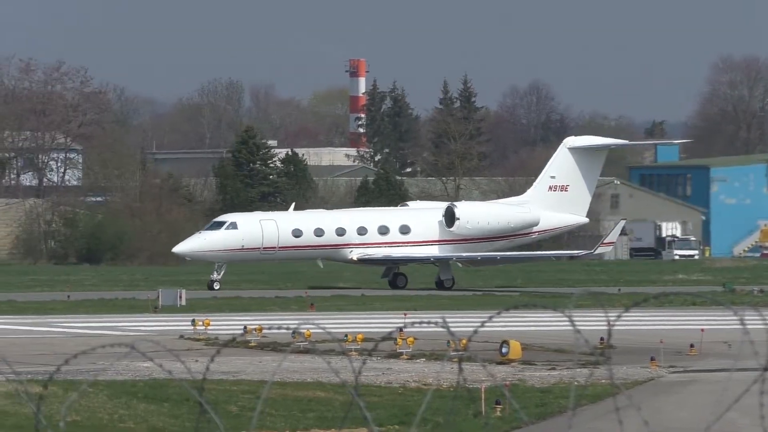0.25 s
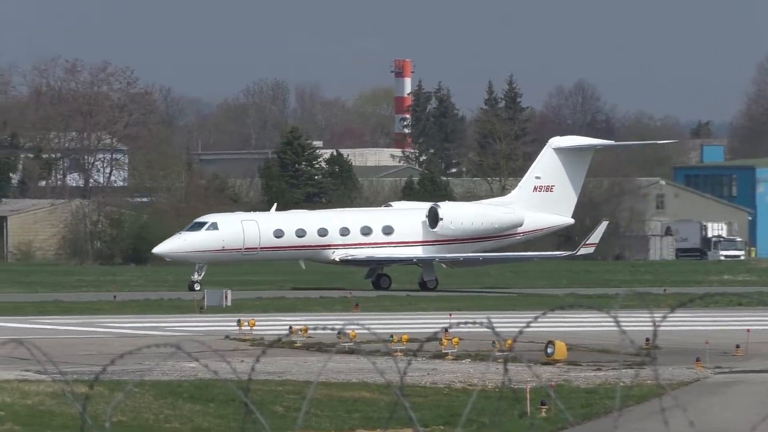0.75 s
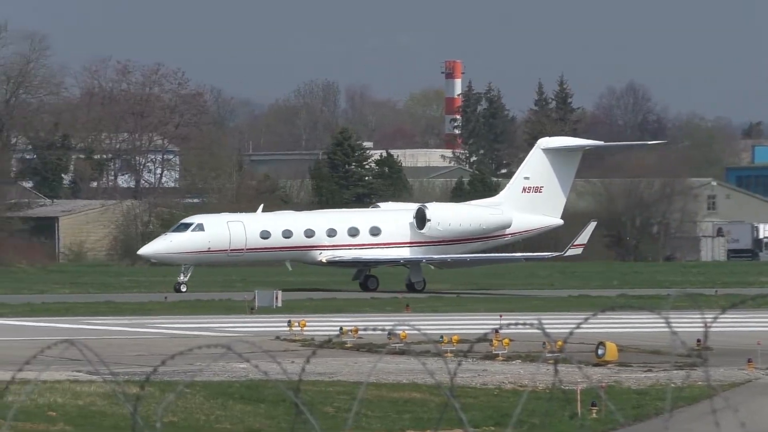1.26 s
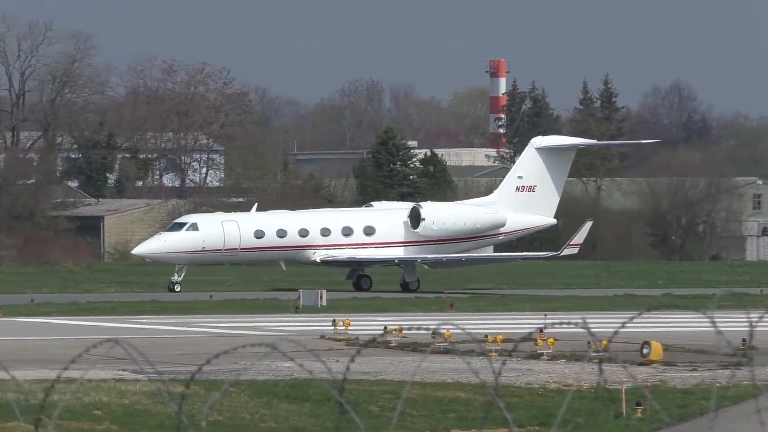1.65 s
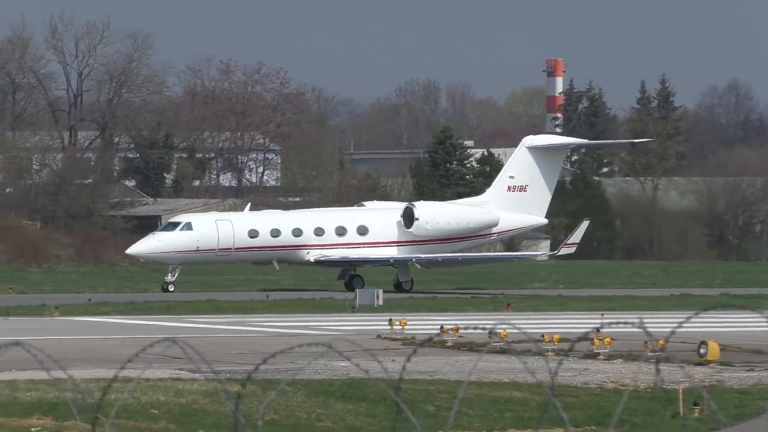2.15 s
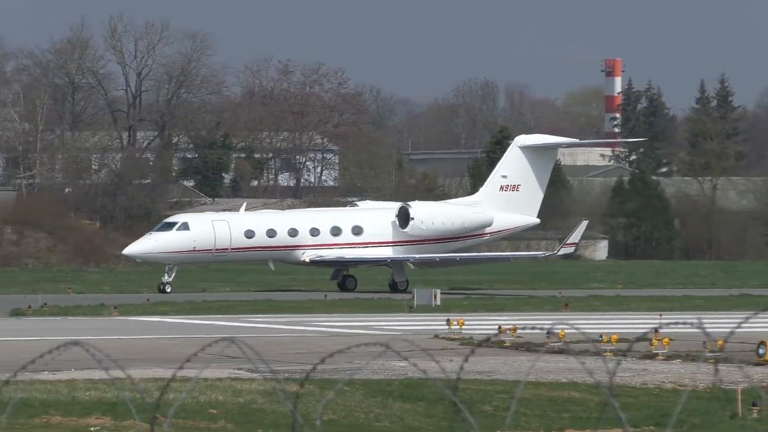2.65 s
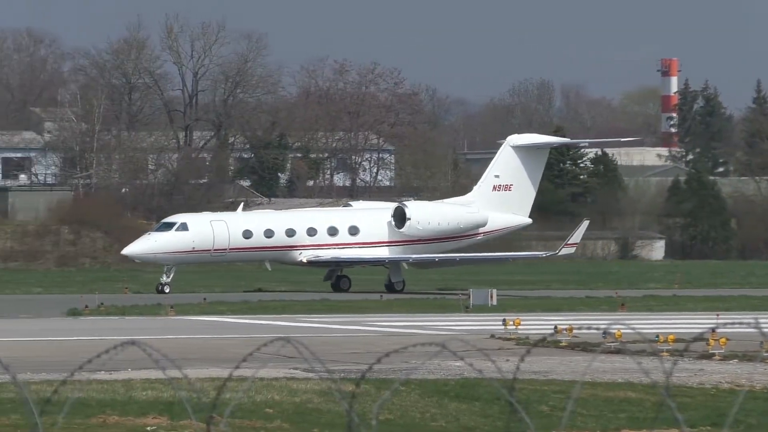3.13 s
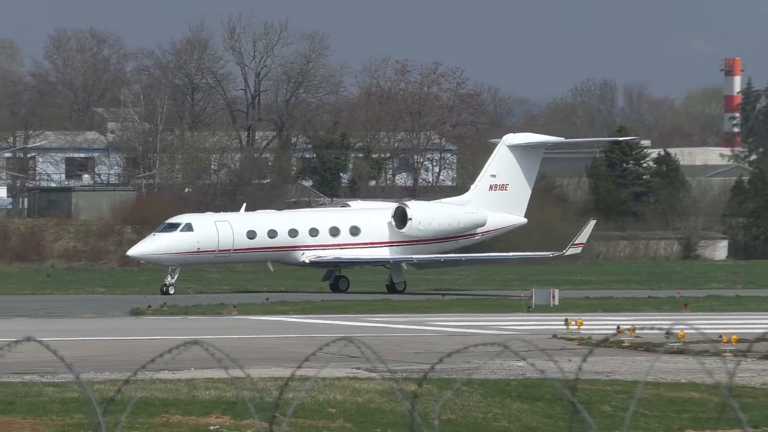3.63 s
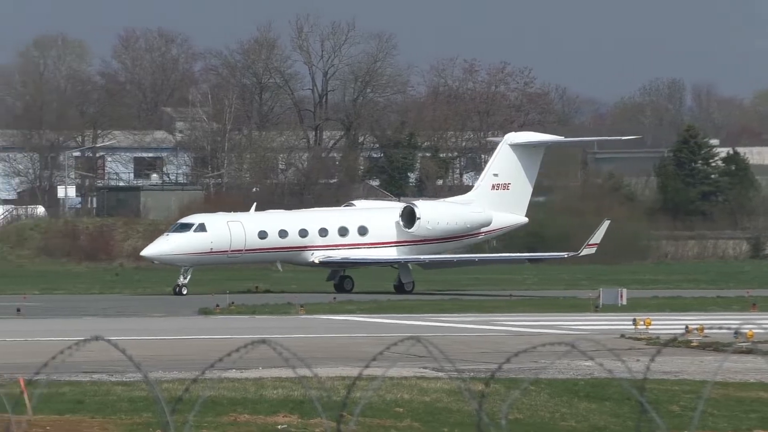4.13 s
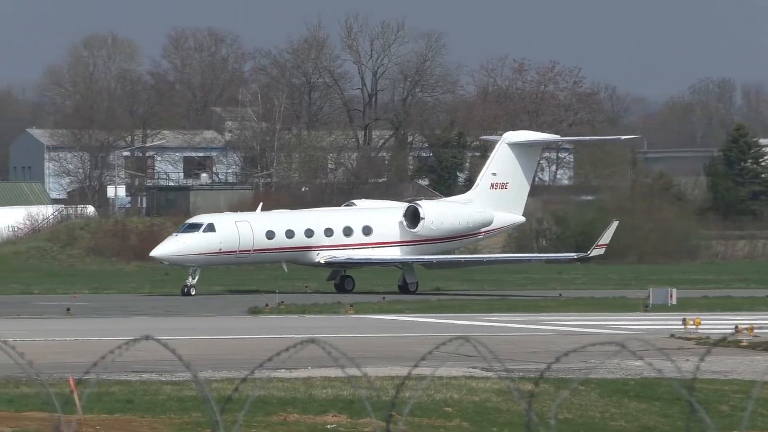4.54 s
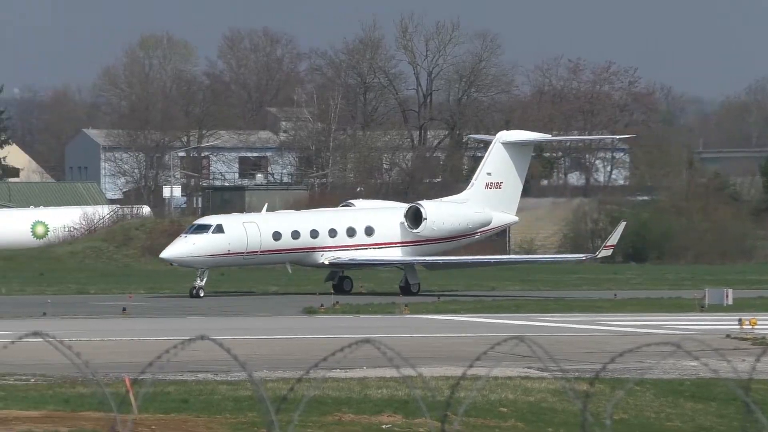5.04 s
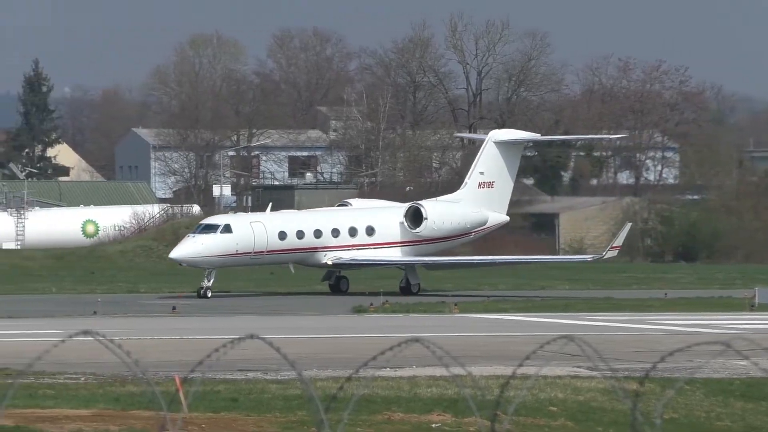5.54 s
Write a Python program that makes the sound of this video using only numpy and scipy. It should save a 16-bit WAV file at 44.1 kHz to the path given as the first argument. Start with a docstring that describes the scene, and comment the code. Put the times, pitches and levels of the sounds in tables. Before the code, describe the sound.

Across an open airfield, jet engines whine and rush unsteadily, growing stronger, while low wind thumps and small bright ticks rattle nearby.

```python
"""A twin-engined business jet taxis past at idle, heard across an airfield from behind the fence.
Compressor and turbine tones follow the engine speed and fade in and out in the moving air.
Shaped noise makes the engines' roar, rush and hiss; a smeared fan tone and a drone sound within it.
Wind buffets the microphone as low noise. Close by, runs of ticks on ringing modes rattle three times,
a few lone ticks fall, and a soft band of high hiss swells once."""
import sys
import numpy as np
from scipy import signal
from scipy.fft import rfft, irfft, next_fast_len
from scipy.io import wavfile
from scipy.ndimage import uniform_filter1d

SR = 44100
rng = np.random.default_rng(int(sys.argv[2]) if len(sys.argv) > 2 else 0)


def file_out(sig):
    """Save sig as 16-bit WAV at sys.argv[1]."""
    # one column per channel
    cols = np.atleast_2d(sig).T
    # limit, then scale
    lim = np.clip(cols, -1, 1)
    pcm = np.round(lim * 32767).astype(np.int16)
    wavfile.write(sys.argv[1], SR, pcm)


N = 255339
T = np.arange(N) / SR  # s
FROM_MIDDLE_S = T - T.mean()
IDLE_HZ = 2051  # strongest compressor tone at idle

# engine noise, relative levels: t/s, roar/dB, rush/dB, intake hiss/dB, fine hiss/dB
FLOW_LEVELS = [(0.0, -43, -45.5, -56, -56), (0.18, -48.5, -43.5, -53, -56.5), (0.73, -41, -37, -38, -44.5),
               (1.33, -39.5, -40.5, -44.5, -54.5), (1.54, -40.5, -36.5, -39, -44.5),
               (1.66, -39, -38.5, -49, -51), (1.86, -39.5, -35, -46.5, -47), (2.27, -39, -40.5, -50.5, -53),
               (2.45, -39, -44, -48.5, -51.5), (2.8, -40.5, -39, -60.5, -54), (3.02, -37, -30.5, -43, -45),
               (3.18, -37.0, -33.0, -53, -50.5), (3.4, -34.5, -36, -47.5, -45.5),
               (3.68, -35, -37, -53.5, -51), (4.06, -32, -31.5, -49, -48.0), (4.6, -34, -33.5, -49.5, -50),
               (5.05, -31, -33, -40, -44), (5.33, -24.5, -29.5, -37.5, -41), (5.63, -38, -32.5, -46, -49.5),
               (5.79, -38, -32, -40.5, -38.5)]
# low end of the engines, relative levels: t/s, deep rumble/dB, upper rumble/dB, drone/dB
EXHAUST_LEVELS = [(0.0, -42, -49.0, -29.5), (0.55, -39, -45, -32.0), (1.1, -41, -43.5, -34.5),
                  (1.55, -37.5, -44.5, -29.5), (2.1, -40, -44.5, -32.5), (2.7, -39.5, -45, -35),
                  (3.15, -36.5, -42.5, -26), (3.7, -43.5, -47.5, -34.5), (4.5, -46.0, -46.5, -35),
                  (5.2, -41.0, -41.0, -34.0), (5.79, -44.5, -46, -38.5)]
# engine noise spectrum: f/Hz, relative density/dB per Hz
ENGINE_SPECTRUM = [(150, -8), (320, -6.5), (430, -10.5), (600, -6), (850, -3), (1080, 1.5), (1450, -5.5),
                   (1850, -11), (2550, -9), (3100, -6), (3800, -15.5), (4700, -23), (6000, -35.5),
                   (10000, -55.5), (15000, -54.5)]


def from_db(db):
    """Decibels to amplitude gain."""
    return 10 ** (np.asarray(db) / 20)


def rms_one(x):
    """Scale to unit rms."""
    return x / np.sqrt(np.mean(x ** 2) + 1e-20)


def in_time(rows):
    """Columns of a time table, interpolated at every sample."""
    s, *columns = np.transpose(rows)
    return [np.interp(T, s, c) for c in columns]


def hump(s, rise_s, fall_s):
    """Gaussian bump of height 1 at time s; 1/e half widths before and after it."""
    return np.exp(-((T - s) / np.where(T < s, rise_s, fall_s)) ** 2)


def drift(rate_hz):
    """Slow random signal of about unit rms: white noise through a two-pole low-pass at rate_hz."""
    step = 40  # samples between drawn values
    r = np.exp(-2 * np.pi * step * rate_hz / SR)
    white = rng.standard_normal(N // step + 2002)
    slow = signal.lfilter([1], [1, -2 * r, r * r], white)[2000:]  # filter settled
    return np.interp(np.arange(N) / step, np.arange(len(slow)), rms_one(slow))


def noise(spectrum, low_hz, high_hz):
    """Gaussian noise of the given spectrum between two soft edges; rms 1."""
    size = next_fast_len(N, real=True)
    hz = np.maximum(np.fft.rfftfreq(size, 1 / SR), .5)
    point_hz, point_db = np.transpose(spectrum)
    gain = from_db(np.interp(np.log(hz), np.log(point_hz), point_db))
    edges = (1 + (low_hz / hz) ** 20) * (1 + (hz / high_hz) ** 20)
    shaped = rfft(rng.standard_normal(size)) * gain / np.sqrt(edges)
    return rms_one(irfft(shaped)[:N])


def tone(hz, flutter, flutter_hz):
    """Sine on a pitch track plus the part that turbulence scatters in both quadratures; rms 1."""
    phase = 2 * np.pi * (np.cumsum(hz * np.ones(N)) / SR + rng.random())
    in_phase = (1 + flutter * drift(flutter_hz)) * np.cos(phase)
    quadrature = flutter * drift(flutter_hz) * np.sin(phase)
    return rms_one(in_phase + quadrature)


def blade_tones(tones, speed, partner_db, flutter, fade_db, twinkle_db):
    """Each tone has a faint partner 0.4% higher; the tones beam and fade separately."""
    out = np.zeros(N)
    for hz, db, turn_db_per_s in tones:
        strong = tone(hz * speed, flutter, flutter_hz=6.7)
        partner = tone(hz * speed * 1.004, flutter, flutter_hz=14)
        # eddies make the tone come and go, slowly and quickly
        air_db = fade_db * drift(1.0) + twinkle_db * np.tanh(drift(8.9))
        level_db = db + turn_db_per_s * FROM_MIDDLE_S + air_db
        out += from_db(level_db) * rms_one(strong + from_db(partner_db) * partner)
    return out


def whine(speed):
    """Compressor and turbine stages follow engine speed; the upper tones surge with the fine hiss."""
    # strength of the main tones as the air carries them: t/s, level/dB
    main_curve = [(0.0, -52), (0.27, -48.0), (0.41, -39.5), (0.58, -44), (0.88, -38), (1.04, -45),
                  (1.58, -33), (1.85, -42), (2.1, -41), (2.4, -59.5), (2.58, -43), (2.92, -49.5),
                  (3.02, -34), (3.26, -36.5), (3.48, -44.5), (4.02, -30), (4.55, -38.5), (4.84, -31.5),
                  (5.05, -43.5), (5.42, -44), (5.6, -35.5), (5.79, -31)]
    # strength of the highest tones: t/s, turbine level/dB, top level/dB (relative)
    whistle_curve = [(0.0, -66.5, -81), (0.7, -64, -69.5), (1.38, -69.5, -74.5), (1.55, -60.5, -64),
                     (1.9, -59, -69.5), (2.35, -63, -69), (2.8, -63, -70), (3.0, -68, -65),
                     (3.45, -55, -63.5), (3.7, -67, -72), (4.35, -57, -62), (4.7, -55, -57.5),
                     (5.1, -56, -57), (5.5, -54.5, -63), (5.79, -60, -72)]
    # tones at idle speed: f/Hz, relative level/dB, change as the jet turns/dB per s
    main_tones = [(2051, 2.5, 0), (2021, -15.5, -1), (2149, -7, -1.5), (2345, -12, 0.5), (2508, -26, -5.5),
                  (2120, -16, -1.5)]
    upper_tones = [(3226, -4, 0), (3062, -7.5, -.3), (3158, -13, -2), (2794, -14, .5), (3512, -20, 0),
                   (3935, -16, 0), (4102, -18, 0)]
    turbine_tones = [(5052, -2, 0), (4338, -5, .2)]
    top_tones = [(5768, -1.5, 0), (6487, -13, 0), (7171, -30, 0), (7849, -30, 0)]

    main_db, = in_time(main_curve)
    turbine_db, top_db = in_time(whistle_curve)
    fine_db = in_time(FLOW_LEVELS)[-1]
    # level at mid-pass, trend as the jet turns, surges of the fine hiss
    upper_db = -45 - 0.43 * FROM_MIDDLE_S + (fine_db - fine_db.mean())

    main = from_db(main_db) * blade_tones(
        main_tones, speed, partner_db=-19.5, flutter=0.17, fade_db=1.06, twinkle_db=2.0)
    # unsteady flow over the blades spreads a hoarse skirt around the strongest tone
    skirt = from_db(main_db - 17) * tone(IDLE_HZ * speed, flutter=4, flutter_hz=70)
    upper = from_db(upper_db) * blade_tones(
        upper_tones, speed, partner_db=-22.5, flutter=0.26, fade_db=3.5, twinkle_db=3.5)
    turbine = from_db(turbine_db + 4.5) * blade_tones(
        turbine_tones, speed, partner_db=-24.5, flutter=0.41, fade_db=2.5, twinkle_db=4.0)
    top = from_db(top_db + 5.5) * blade_tones(
        top_tones, speed, partner_db=-22.5, flutter=0.34, fade_db=-2.0, twinkle_db=6.0)
    return main + skirt + upper + turbine + top


def engine_noise(speed):
    """Turbulent flow in noise bands that the air carries unequally, plus the smeared fan tones."""
    roar_db, rush_db, intake_db, fine_db = in_time(FLOW_LEVELS)
    rumble_db = in_time(EXHAUST_LEVELS)[1]

    low_roar_db = (roar_db + rumble_db) / 2 - 5  # between the rumble and the roar
    low_roar = from_db(low_roar_db) * noise(ENGINE_SPECTRUM, 447, 616)
    roar = from_db(roar_db - 3.5 + 0.6 * drift(8)) * noise(ENGINE_SPECTRUM, 637, 894)

    lean_db = 0.5 * FROM_MIDDLE_S  # the rush leans to its low side as the jet turns
    low_rush = from_db(lean_db - 3.5) * noise(ENGINE_SPECTRUM, 924, 1370)
    high_rush = from_db(-lean_db - 3.0) * noise(ENGINE_SPECTRUM, 1353, 2317)
    rush = from_db(rush_db + 0.75 * drift(23)) * (low_rush + high_rush)

    intake = from_db(intake_db + 0.7 + 0.43 * drift(8)) * noise(ENGINE_SPECTRUM, 2150, 3130)
    fine = from_db(fine_db + 1.4 + 1.0 * drift(7)) * noise(ENGINE_SPECTRUM, 3410, 16000)

    # fan blades chop ragged inflow, which smears their tone and its octave into a narrow howl
    fan = from_db(roar_db - 5.0) * tone(718 * speed, flutter=2.2, flutter_hz=30)
    octave_db = -46.5 + 0.69 * (rush_db - rush_db.mean())  # follows part of the rush's surges
    octave = from_db(octave_db) * tone(1436 * speed, flutter=4.5, flutter_hz=41)

    total = low_roar + roar + rush + intake + fine + fan + octave
    return total * from_db(1.2 * drift(7.1))


def moving_air(x, scatter=0.062):
    """Eddies bend sound onto slightly longer paths that come and go, so its colour swirls."""
    out = x.copy()
    for delay_s in (.0005, .0011, .0023):
        late_s = delay_s * (1 + 0.059 * drift(0.75))
        out += scatter * drift(0.92) * np.interp(T - late_s, T, x)
    return out


def exhaust():
    """Two bands of dull rumble, with a throbbing drone and a few weaker steady tones."""
    # tones beside the drone: f/Hz, level/dB
    hum_tones = [(107, -43.5), (253.5, -56), (507, -57.5)]
    deep_db, upper_db, drone_db = in_time(EXHAUST_LEVELS)
    deep = from_db(deep_db - 2.0) * noise(ENGINE_SPECTRUM, 73, 201)
    upper = from_db(upper_db + 0.13) * noise(ENGINE_SPECTRUM, 220, 480)
    drone = from_db(drone_db - 0.34) * tone(91.46, flutter=0.22, flutter_hz=7.7)
    hum = sum(from_db(db) * tone(hz, flutter=0.36, flutter_hz=2.1) for hz, db in hum_tones)
    return deep + upper + drone + hum


def wind():
    """Big eddies swell slowly at the microphone, small ones flutter, and each gust thuds."""
    # wind spectrum: f/Hz, relative density/dB per Hz
    wind_spectrum = [(2, -8), (6, -10.5), (11, 6.5), (20, -9.5), (28, -12.5), (40, -22.5), (60, -19),
                     (80, -32), (120, -32), (170, -49), (300, -73)]
    # slow pressure swell, before limiting: t/s, relative level/dB
    breeze_curve = [(0.0, -14), (2.4, -11), (3.1, -19), (3.5, -7.5), (3.9, -19), (4.4, -11.5), (4.9, -22),
                    (5.3, -19), (5.65, -6.5)]
    # gust thuds: t/s, level/dB, 1/e half width/s
    gusts = [(0.03, -21, .05), (0.2, -20, .07), (0.72, -23, .04), (1.0, -21, .03), (1.15, -20, .04),
             (2.01, -24, .04), (2.22, -23, .03), (2.4, -18, .03), (3.45, -24, .04), (3.9, -23, .05),
             (4.07, -24, .04), (4.37, -21, .03), (5.45, -25, .07)]

    swell_db, = in_time(breeze_curve)
    swell = noise(wind_spectrum, 3.8, 24)
    local_power = uniform_filter1d(swell ** 2, size=SR // 5)
    swell = swell / np.sqrt(local_power + 0.041)  # evened out, so the curve sets the level
    swell = .5 * np.tanh(from_db(swell_db) * swell / .5)  # soft limit at 0.5

    flutter_gain = from_db(-31 + 1.6 * drift(5.7))  # small eddies between the gusts
    gust_gain = sum(from_db(db) * hump(s, half_s, half_s) for s, db, half_s in gusts)
    return swell + (flutter_gain + gust_gain) * noise(wind_spectrum, 27.0, 400)


def rattles():
    """Runs of ticks, each a sharp click then grit, drive the ringing modes of a small bright body."""
    # starts of the rattles: t/s, relative level/dB
    rattle_starts = [(.6695, 0), (2.3257, -2), (2.6065, -2)]
    # ticks of one rattle: delay/s, relative level/dB, length/s
    run_ticks = [(-.007, -14, .0015), (0, 1, .001), (.006, -10, .003), (.0175, -2, .0025),
                 (.025, -13, .002), (.043, 1, .003), (.058, -17, .018), (.0775, 0, .003), (.081, 0, .002)]
    # lone faint ticks: t/s, relative level/dB
    lone_ticks = [(.372, -21), (1.888, -16), (2.021, -15), (2.466, -31)]
    # ringing modes: f/Hz, width/Hz, relative level/dB
    ring_modes = [(6390, 430, 2), (7800, 1300, -8.5), (9000, 570, -10.5), (10700, 1200, -18.5),
                  (12000, 1100, -15.5), (14100, 900, -22)]

    ticks = []
    for start_s, rattle_db in rattle_starts:
        for delay_s, db, length_s in run_ticks:
            ticks.append((start_s + delay_s, rattle_db + db, length_s))
    ticks += [(s, db, .001) for s, db in lone_ticks]

    scrape, clicks, out = np.zeros(N), np.zeros(N), np.zeros(N)
    for s, db, length_s in ticks:
        at = int(s * SR)
        age = np.arange(SR // 20) / max(length_s * SR, 2)  # in tick lengths
        grit = np.exp(-age ** 2) + .11 * np.exp(-age / 5)  # burst and faint tail
        scrape[at:at + len(age)] += from_db(db) * grit
        clicks[at] = from_db(db + 15)
    force = scrape * rng.standard_normal(N) + clicks + 1e-18

    for k, (hz, width_hz, db) in enumerate(ring_modes):
        r = np.exp(-np.pi * width_hz / SR)
        zeros = np.array([1, 0, -1]) * (1 - r * r) / 2
        poles = [1, -2 * r * np.cos(2 * np.pi * hz / SR), r * r]
        out += (-1) ** k * from_db(db) * signal.lfilter(zeros, poles, force)  # alternate signs
    high_pass = signal.butter(2, 4500, "high", fs=SR, output="sos")
    return from_db(-26.5) * signal.sosfilt(high_pass, out)


def soft_hiss():
    """High noise rises and falls exponentially around one peak."""
    # hiss spectrum: f/Hz, relative density/dB per Hz
    soft_spectrum = [(4000, -10), (6500, 0), (9000, -5), (11000, -11), (13000, -11), (14100, -6.5),
                     (15200, -23)]
    peak_s, peak_db, decay_s = 4.935, -51, .088
    swell = np.exp(-np.abs((T - peak_s) / decay_s))
    return from_db(peak_db) * swell * noise(soft_spectrum, 4500, 16000)


def scene():
    """One image leans to the right over microphone hiss; the engine sound dips in level three times."""
    # engine speed as pitch of the strongest compressor tone: t/s, f/Hz
    spool_curve = [(0.0, 2067), (0.55, 2066.5), (1.1, 2071), (1.8, 2059.5), (2.4, 2053.5), (3.1, 2059),
                   (4.2, 2047.5), (5.0, 2052), (5.79, 2051)]
    # brief level dips in the engine sound: t/s, depth/dB, fall/s, recovery/s
    dips = [(2.44, 5.5, 0.017, 0.098), (3.561, 9.5, 0.057, 0.058), (4.19, 6.5, 0.044, 0.042)]
    # microphone hiss spectrum: f/Hz, relative density/dB per Hz
    mic_spectrum = [(3000, -13), (10000, 6.5), (14000, 4), (16000, -8)]

    speed = in_time(spool_curve)[0] / IDLE_HZ * (1 + 0.00028 * drift(4))  # 1 at idle
    dip_db = sum(depth_db * hump(s, fall_s, recovery_s) for s, depth_db, fall_s, recovery_s in dips)
    engines = from_db(-dip_db) * (whine(speed) + moving_air(engine_noise(speed)) + exhaust())
    wind_fade = np.minimum(1, np.minimum(T, T[-1] - T) / .015)  # 15 ms at both ends
    sound = engines + wind_fade * wind() + rattles() + soft_hiss()
    mic_hiss = np.array([noise(mic_spectrum, 3000, 16000) for channel in range(2)])
    return sound * from_db([[-4.1], [2.8]]) + from_db(-82) * mic_hiss  # left, right


def record(dry):
    """The highest peaks are rounded towards 0.95; a steep low-pass cuts the top, 70 dB by 16.7 kHz."""
    rounded = dry / (1 + (dry / .95) ** 8) ** (1 / 8)
    low_pass = signal.cheby2(14, 70, 16700, fs=SR, output="sos")
    return signal.sosfilt(low_pass, rounded)


dry = scene()
out = record(dry)
file_out(out)
```